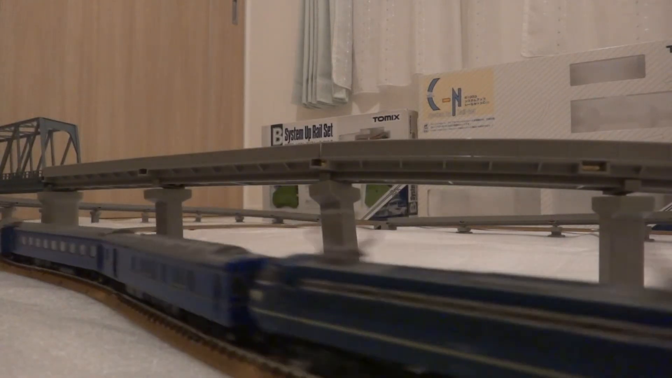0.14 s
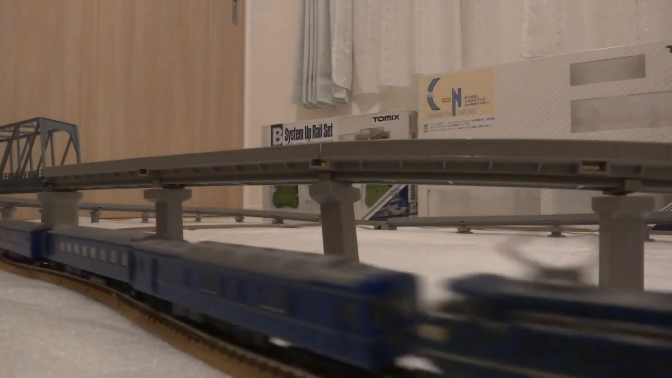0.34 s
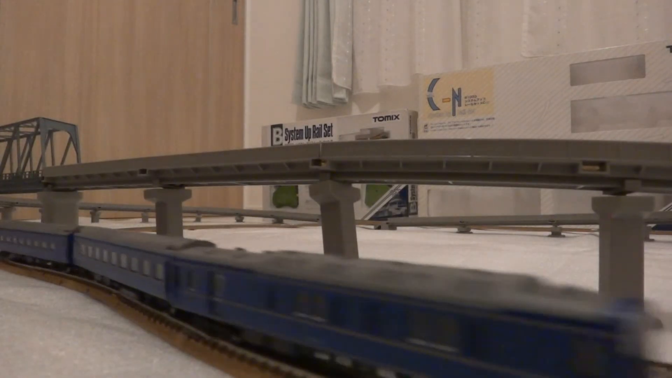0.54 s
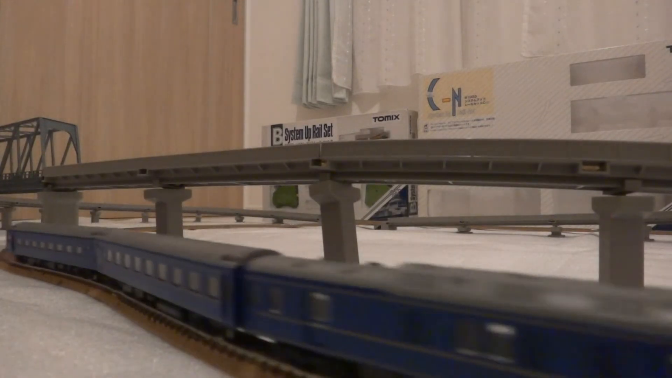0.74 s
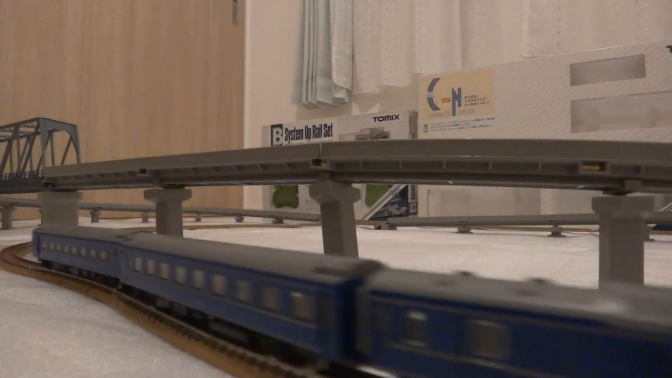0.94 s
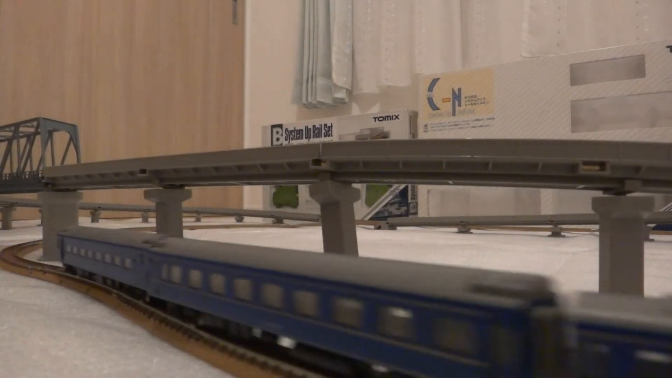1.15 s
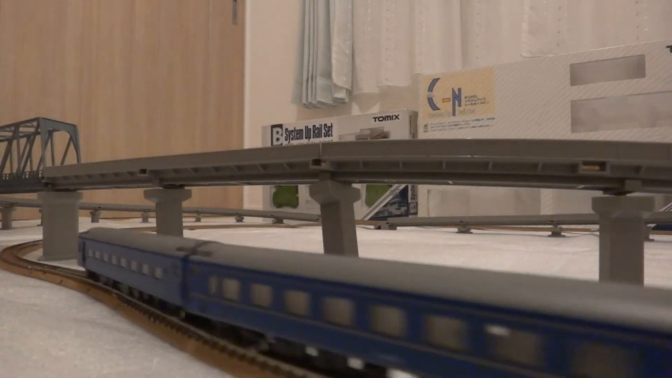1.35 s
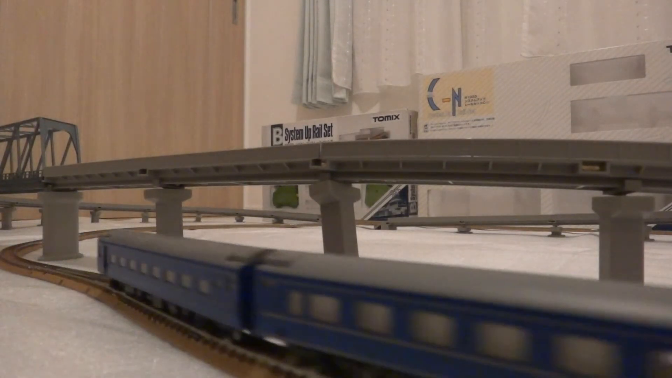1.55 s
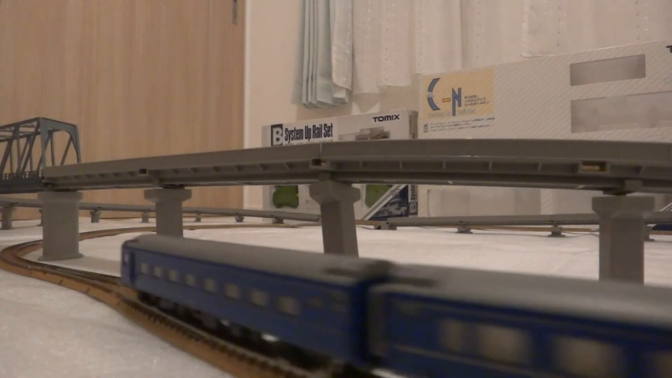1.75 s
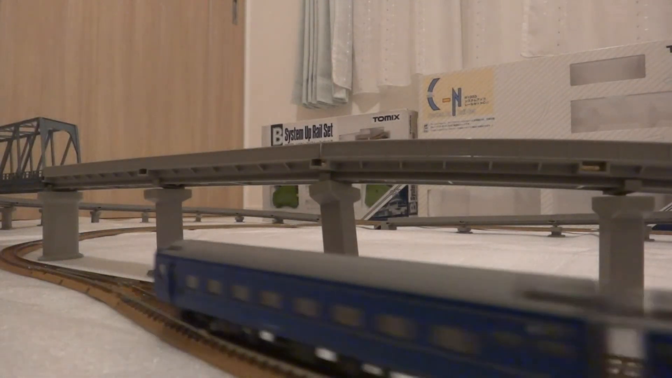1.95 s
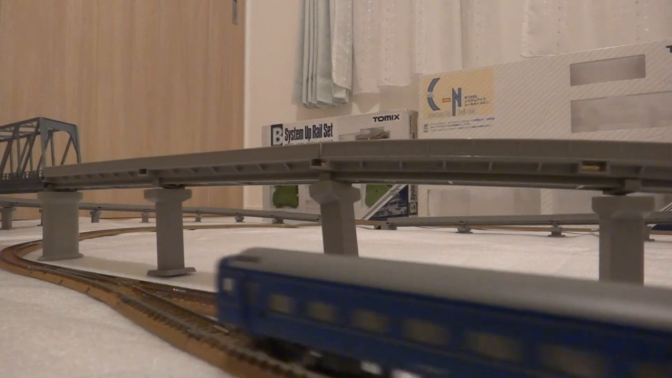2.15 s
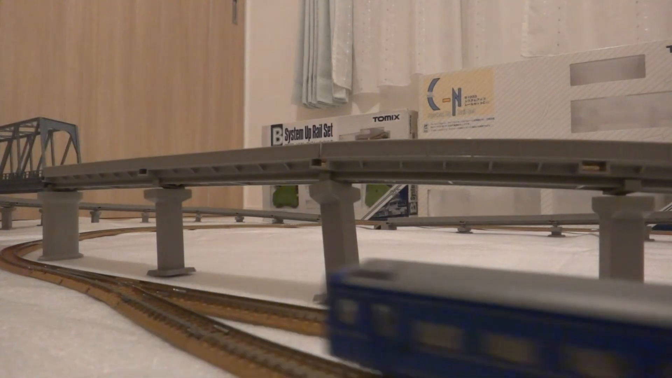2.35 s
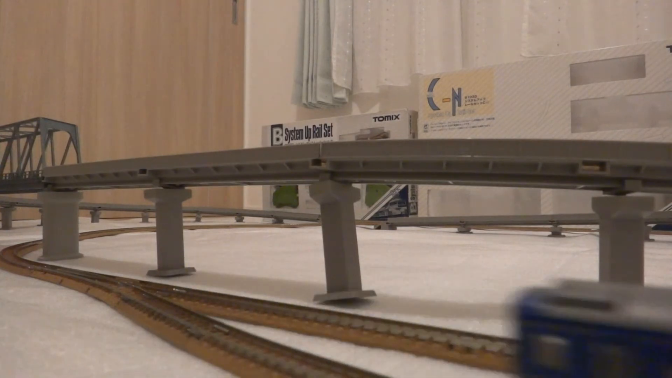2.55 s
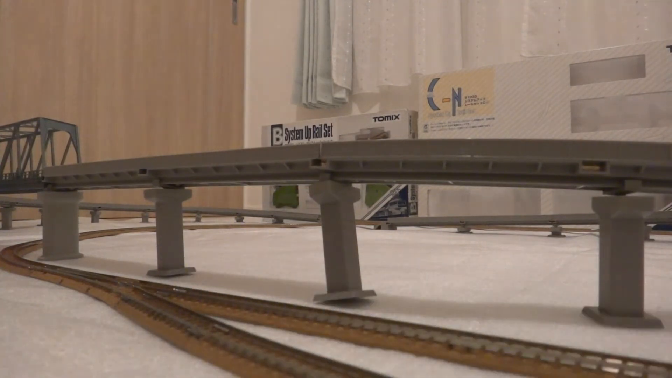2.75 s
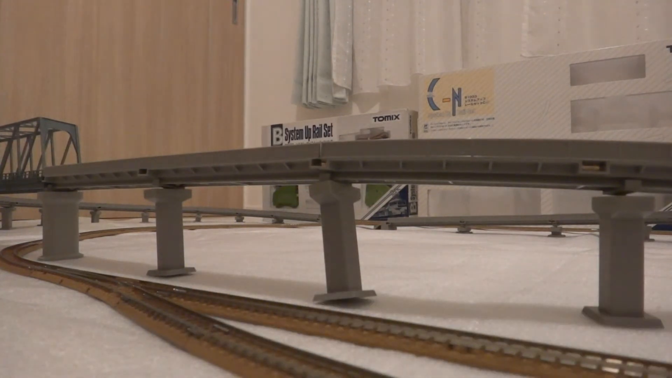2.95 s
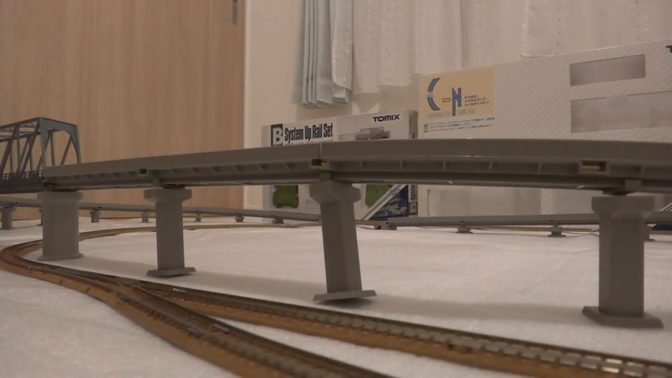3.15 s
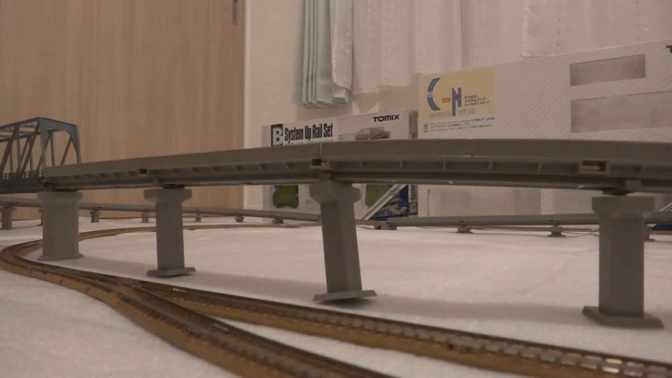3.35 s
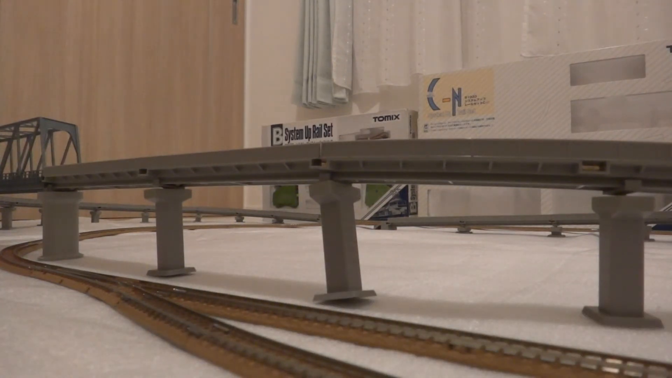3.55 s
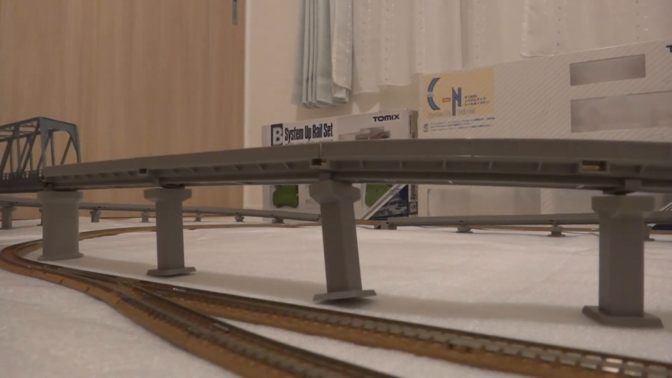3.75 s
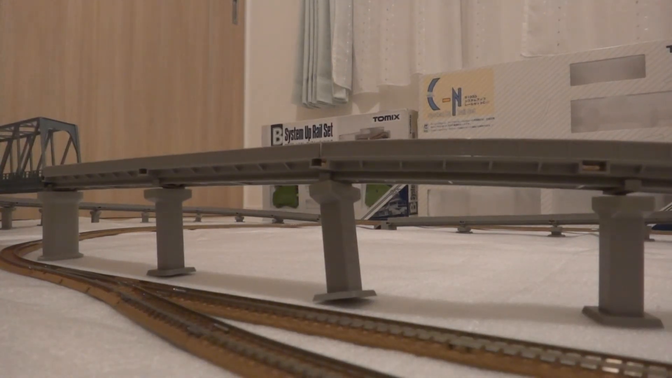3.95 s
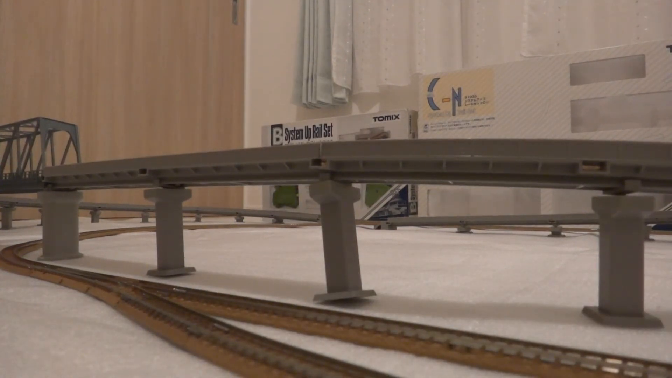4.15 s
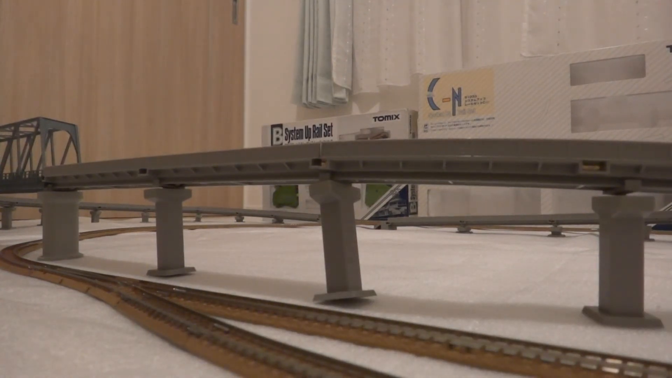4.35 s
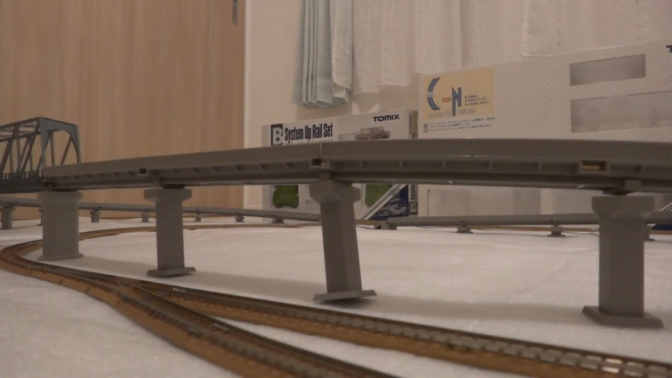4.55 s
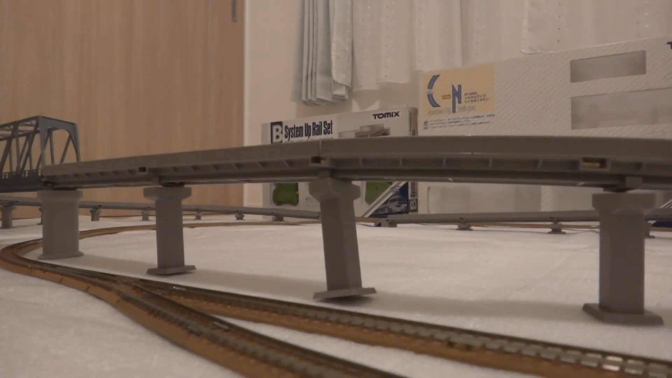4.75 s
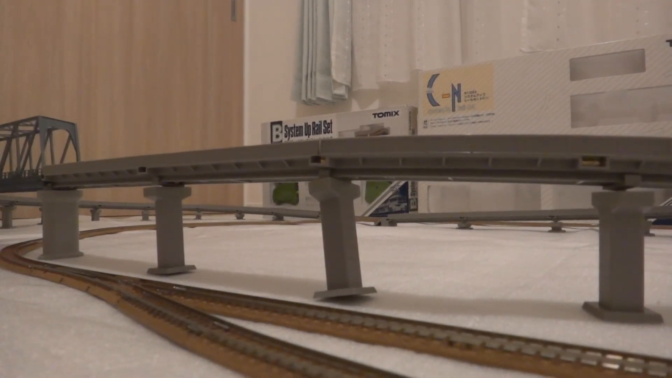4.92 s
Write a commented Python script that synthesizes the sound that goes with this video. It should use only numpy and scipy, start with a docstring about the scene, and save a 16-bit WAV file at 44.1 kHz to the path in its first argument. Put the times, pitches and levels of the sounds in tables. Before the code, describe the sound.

A model train's motor buzzes past in a quiet room, its coaches rushing and ticking over plastic track before receding.

```python
"""A small electric model train passes close by on plastic track in a quiet room and rounds the far curve.
The locomotive leads: periodic gear impacts make its shell buzz, and its pickups sizzle by sliding friction.
The coaches follow, their wheel roughness forcing the rails, bodies and hollow track bed into vibration.
Impacts at joints and points tick, wheel friction squeaks and sings in the curve, and at last a far
viaduct resonates with the locomotive. One soft bump is heard as the train recedes."""
import sys
import numpy as np
from scipy import signal
from scipy.fft import rfft, irfft
from scipy.io import wavfile

SR = 44100
rng = np.random.default_rng(int(sys.argv[2]) if len(sys.argv) > 2 else 0)


def dump(signal):
    """Clip the signal to [-1, 1] and save it as 16-bit WAV at the path in sys.argv[1]."""
    limited = np.clip(np.atleast_2d(signal).T, -1, 1)
    pcm = np.round(limited * 32767).astype(np.int16)
    wavfile.write(sys.argv[1], SR, pcm)


N = 224067
TIME = np.arange(N) / SR
FREQS = np.maximum(np.arange(N // 2 + 1) * SR / N, 1)

# Background noise of the room: frequency_hz, density_db
ROOM_SPECTRUM = [(20, -8), (45, -7), (85, 3.5), (125, -5), (175, 5), (240, 1), (400, -6), (700, -3),
                 (1100, 3.5), (3000, -41)]
# Stereo width of the reverberation: frequency_hz, side_gain_db
ROOM_WIDTH = [(30, -10), (70, -10.5), (130, -12), (260, -3.5), (500, -8), (1000, -10.5), (2500, -13.5),
              (6000, -12.5), (14000, -13)]
# Notches in the microphone response: centre_hz, width_hz, depth_fraction
MIC_NOTCHES = [(2260, 160, .22), (6820, 400, .2), (12240, 220, .56), (13490, 300, .67), (13930, 140, .45),
               (14730, 330, .63)]
# Channel balance: frequency_hz, left_minus_right_db
MIC_BALANCE = [(100, -1.5), (300, 0.5), (550, 0), (1000, -1), (2200, -2), (5000, -2.1), (9000, -1.2),
               (13000, 0)]

# Modes of the far viaduct: pitch_hz, width_hz, gain_db
VIADUCT_MODES = [(2600, 210, -2), (2940, 450, -0.5), (3500, 150, 0), (3850, 180, 0), (4560, 270, -0.5),
                 (5140, 270, 1.5), (6040, 310, -1), (7100, 220, -3), (8000, 340, 0), (8760, 240, -4),
                 (9970, 280, 1), (11300, 300, -8), (11800, 400, -9), (12400, 350, -4.5), (14600, 1400, -12)]
# Modes of the rails: pitch_hz, width_hz, gain_db
RAIL_MODES = [(1797, 120, -5), (2590, 78, 0), (3440, 220, 4.5), (3900, 190, 2), (4670, 230, 5.5),
              (5000, 260, 5.5), (5720, 250, 1.5), (6100, 180, 1)]
# Modes of wheels rubbing in the curve: pitch_hz, width_hz, gain_db
SONG_MODES = [(4850, 130, 0), (5020, 120, 0), (6000, 200, 0.5), (6500, 250, -3), (7600, 400, -4),
              (8650, 320, -2), (9600, 300, -13), (10900, 600, -0.5), (12800, 310, -13)]
# Wheels binding in the curve: peak_s, half_length_s, level_db
WHEEL_BINDS = [(2.104, 0.068, -25.5), (3.33, 0.07, -38)]
# Brief squeaks, scrapes and rings of the passing wheels and coach bodies:
# peak_s, half_length_s, pitch_hz, width_hz, slide_hz_per_s, level_db
SQUEAKS_AND_RINGS = [(1.856, 0.085, 3096, 1100, 0, -30.5), (1.9, 0.046, 10630, 1512, -6000, -26.5),
                     (2.164, 0.019, 11000, 1500, -9000, -30), (2.135, 0.018, 4800, 300, -1500, -32),
                     (2.7, 0.07, 4690, 172.8, -300, -35), (2.555, 0.05, 3550, 486, 4001.5, -32),
                     (2.69, 0.055, 3930, 203, -0.5, -35.5), (2.76, 0.041, 7960, 500, -6000, -33),
                     (2.867, 0.092, 1790, 260, -1.5, -38.5), (2.946, 0.13, 11350, 1100, 0.5, -37.5),
                     (2.96, 0.09, 4850, 185.2, 0, -39.5), (3.29, 0.055, 4780, 200, -6, -38),
                     (3.282, 0.08, 2560, 231.5, 0.5, -40), (3.16, 0.025, 8550, 740, -0.5, -33),
                     (3.33, 0.07, 6100, 200, 802, -35), (3.35, 0.042, 10800, 1400, 1.5, -34)]

# Blows on joints and points, often with a bounce: start_s, wheel_ring_db, rail_snap_db, bed_thump_db
JOINT_IMPACTS = [(0.512, -22, -20, -43), (0.574, -9, -5, -60), (0.632, -19, -6, -62), (0.695, -13, -9, -62),
                 (0.726, -9, -11, -52), (0.7604, -6, -9, -46), (0.7933, -14, -4, -63),
                 (0.7976, -14, -7, -60), (0.833, -17, -14, -45), (0.8366, -13, -6, -62),
                 (0.8754, -13, -6, -58), (0.9041, -11, -15, -56), (0.9147, -14, -12, -58),
                 (0.9448, -16, -6, -60), (0.983, -10, -5, -51), (1.0547, -8.5, -9, -64),
                 (1.0943, -9, -5, -62), (1.1668, -18, -5, -66), (1.223, -9, -6, -56),
                 (1.2312, -13, -11, -62), (1.2957, -7, -6, -45), (1.2984, -12, -3, -59),
                 (1.3092, -17, -12, -60), (1.3911, -8, -10, -56), (1.4653, -7, -8, -52),
                 (1.4986, -6.5, -13, -42), (1.5008, -12, -11, -62), (1.5058, -14, -11, -60),
                 (1.5078, -11, -12, -62), (1.5641, -10, -10, -42), (1.567, -8, -8, -60),
                 (1.5725, -3, -8, -52), (1.5751, -10, -8, -60), (1.5817, -6, -9, -54),
                 (1.6215, -10, -4, -45), (1.6907, -15, -7, -58), (1.739, -13, -11, -56),
                 (1.9695, -7, -13, -45), (1.9799, -4, -10, -50), (2.0338, -5.5, -8, -58),
                 (2.0413, -9, -6, -54), (2.1935, -6, -12, -62), (2.1964, -18, -10, -62),
                 (2.2564, -5, -8, -56), (2.553, -12, -18, -62), (2.66, -4.5, -17, -46),
                 (2.7338, -5.5, -10, -44), (2.8177, -16, -15, -57), (2.9115, -17, -10, -60),
                 (2.9862, -19, -12, -64), (3.0936, -15, -15, -66), (3.1296, -16, -15, -68),
                 (3.4096, -14, -11, -68), (3.4162, -12, -15, -72), (3.4826, -22, -19, -68),
                 (4.346, -19, -24, -69), (4.569, -22, -19, -70), (4.6366, -22, -16, -70),
                 (4.7798, -12, -14, -62), (4.848, -12, -18, -68), (4.9934, -18, -12, -65),
                 (5.0488, -20, -14, -70)]
# Modes of a struck wheel: pitch_hz, width_hz, gain_db
WHEEL_MODES = [(5200, 2600, -5), (8400, 1600, -0.5), (9900, 1300, -1.5)]
# Modes of a struck rail end: pitch_hz, width_hz, gain_db
RAIL_END_MODES = [(11500, 1000, 0.5), (12450, 1350, -1), (14500, 1100, -12)]
# Modes of the struck hollow track bed: pitch_hz, width_hz, gain_db
BED_MODES = [(260, 36, 3), (308, 60, -5), (500, 120, -14)]

# Strength of the rolling excitation: time_s, level_db
ROLL_LEVEL = [(0.0, -28), (0.07, -26.5), (0.28, -25.5), (0.44, -24.5), (0.64, -25), (0.9, -26),
              (1.16, -27.5), (1.29, -25.5), (1.56, -27.5), (1.63, -28.5), (1.69, -26), (1.93, -25.5),
              (2.01, -27), (2.12, -25), (2.62, -28), (3.03, -30.5), (3.28, -29.5), (3.55, -31),
              (3.95, -32.5), (5.08, -32)]
# Drumming of the track bed: frequency_hz, density_db
BED_SPECTRUM = [(60, -25), (130, -13.5), (205, -11), (255, -4), (330, -3.5), (500, 1), (700, 2), (1200, -3),
                (2500, -40)]
# Rush of the coach bodies: frequency_hz, density_db
COACH_SPECTRUM = [(400, -19.5), (680, -28), (830, -12), (1100, -6), (1300, -3.5), (1680, 2), (2100, 0),
                  (2900, -1), (4000, -11), (6000, -49)]
# Rush of the rails: frequency_hz, density_db
RAIL_SPECTRUM = [(700, -49), (1500, -22), (2200, -1), (2700, -0.5), (3600, 0.5), (4200, 1), (4750, -0.5),
                 (5300, -2.5), (5800, 0.5), (6900, -1.5), (8500, -11), (12000, -8.5)]
# Hiss of rubbing flanges: frequency_hz, density_db
FLANGE_SPECTRUM = [(4000, -4), (6500, -8), (7600, -2.5), (8700, -2.5), (10000, -3), (11400, -4.5),
                   (12800, -8), (14000, -13.5), (15600, -24)]
# Modes of the hollow coach bodies: pitch_hz, width_hz, gain_db
COACH_MODES = [(832, 50, -8.5), (1132, 160, -0.5), (1440, 170, -2), (1700, 126, 2), (1904, 120, 2.5)]
# Coach bodies ringing out as they roll by: peak_s, half_length_s, boost_db
COACH_SWELLS = [(0.74, 0.17, 1), (1.095, 0.061, 8.5), (1.877, 0.055, 2), (2.216, 0.13, 2),
                (2.5, 0.045, 3.5)]

# Speed of the motor: time_s, rotation_hz
MOTOR_SPEED = [(0, 200), (.15, 187), (.34, 196), (.42, 188), (.55, 184), (.9, 180)]
# Modes of the locomotive shell: pitch_hz, width_hz, gain_db
SHELL_MODES = [(1690, 50, -2), (2200, 290, 3.5), (2660, 220, 4), (2900, 310, 5), (3200, 240, -3),
               (3820, 160, 4), (4490, 110, 2)]
# Sizzle of the pickups: frequency_hz, density_db
PICKUP_SPECTRUM = [(4000, -52), (7200, -10), (8100, -1), (8700, 2.5), (9400, 1.5), (10300, 0.5),
                   (11500, -4.5), (13000, -7), (13700, -16), (14150, -1), (14600, -7), (15600, -4.5)]
# Brief labouring of the drive: peak_s, half_length_s, boost_db
DRIVE_SURGES = [(0.138, 0.0098, 1.5), (0.28, 0.031, 3.5), (0.5, 0.007, 3.8), (0.533, 0.008, 3),
                (0.561, 0.0056, 4.5)]


def from_db(db):
    """Amplitude grows tenfold with every 20 dB."""
    return 10 ** (np.asarray(db) / 20)


def rms_one(x):
    """Normalisation to unit mean power."""
    return x / np.sqrt(np.mean(x ** 2) + 1e-20)


def over_time(points):
    """Linear interpolation of a curve at every sample."""
    return np.interp(TIME, *np.transpose(points))


def over_hz(points):
    """Interpolation of a curve on a logarithmic frequency axis."""
    hz, value = np.transpose(points)
    return np.interp(np.log(FREQS), np.log(hz), value)


def passing(full_s, until_s, rise_db_per_s, fall_db_per_s):
    """Exponential growth and decay, in dB, on either side of a plateau at 0 dB."""
    return -rise_db_per_s * np.maximum(full_s - TIME, 0) - fall_db_per_s * np.maximum(TIME - until_s, 0)


def swell(peak_s, half_s):
    """A Gaussian envelope of height 1 and standard deviation half_s."""
    return np.exp(-((TIME - peak_s) / half_s) ** 2 / 2)


def drift(rate_hz):
    """Low-pass filtering turns noise into a slow random fluctuation of rms 1."""
    pole = np.exp(-2 * np.pi * rate_hz * 10 / SR)
    slow = signal.lfilter([1], [1, -2 * pole, pole * pole], rng.standard_normal(N // 10 + 2002))[2000:]
    return np.interp(np.arange(N) / 10, np.arange(len(slow)), rms_one(slow))


def colour(x, spectrum):
    """Spectral shaping, with steep skirts beyond the ends of the table; rms 1."""
    skirts = 1 / np.sqrt((1 + (spectrum[0][0] / FREQS) ** 6) * (1 + (FREQS / spectrum[-1][0]) ** 6))
    return rms_one(irfft(rfft(x) * from_db(over_hz(spectrum)) * skirts, N))


def resonance(x, hz, width_hz):
    """A damped oscillator with a peak gain of 1."""
    radius = np.exp(-np.pi * width_hz / SR)
    feedback = [1, -2 * radius * np.cos(2 * np.pi * hz / SR), radius ** 2]
    return signal.lfilter(np.array([1, 0, -1]) * (1 - radius ** 2) / 2, feedback, x + 1e-18)


def body(x, modes):
    """Modal superposition: a body responds with the sum of its resonances."""
    return sum(from_db(db) * resonance(x, hz, width) for hz, width, db in modes)


def high_pass(x, hz):
    """Radiation efficiency: small parts give off little bass."""
    return signal.sosfilt(signal.butter(4, hz, "high", fs=SR, output="sos"), x)


def contacts(grain_db, flutter_db):
    """Contact noise: countless tiny collisions come in clumps under a fluttering load."""
    return rng.standard_normal(N) * from_db(grain_db * drift(290) + flutter_db * drift(28))


def singing(modes, flicker_db):
    """Friction feeds each mode unevenly, so each swells and fades by itself; rms 1."""
    rubs = rng.standard_normal((3, N))
    rings = sum(from_db(db + flicker_db * drift(5.3)) * resonance(rubs[k % 3], hz, width)
                for k, (hz, width, db) in enumerate(modes))
    return rms_one(high_pass(rings, 0.75 * modes[0][0]))


def coaches_close(arrive_s=0.39, arriving_s=0.49, leave_s=2.84, leaving_s=0.11):
    """Proximity: ramps to 1 as the coaches reach the microphone and to 0 as they leave."""
    return np.clip(np.minimum((TIME - arrive_s) / arriving_s, 1 - (TIME - leave_s) / leaving_s), 0, 1)


def driven(level_db, exponent, close_db, close_db_per_s, usual_roll_db=-25, arrive_s=0.39):
    """Forced response: a part's gain is a power of the rolling excitation, offset near the coaches."""
    roll_db = over_time(ROLL_LEVEL) - usual_roll_db
    offset_db = close_db + close_db_per_s * (TIME - arrive_s)
    return from_db(level_db + exponent * roll_db + offset_db * coaches_close())


def room_tone():
    """Stationary noise, mostly low in frequency, forms the floor of the quiet room."""
    return from_db(-66.5) * colour(rng.standard_normal(N), ROOM_SPECTRUM)


def room(x, t60_s=0.35, tail_db=-12.5, close_pan_db=0.5):
    """Diffuse reflection adds a faint, wide tail; the image leans left while the coaches are close."""
    age = TIME[:SR // 2]
    echoes = rng.standard_normal((2, len(age))) * from_db(-60 * age / t60_s)
    front, across = (signal.fftconvolve(x, echo / np.linalg.norm(echo))[:N] for echo in echoes)
    mid = x + from_db(tail_db) * front
    side = irfft(rfft(across) * from_db(over_hz(ROOM_WIDTH)), N)
    pan = from_db(close_pan_db * coaches_close() * np.array([[.5], [-.5]]))
    return np.array([mid + side, mid - side]) * pan


def bump(at_s=3.6397, peak_db=-42):
    """Heavy damping reduces a low resonance to one dull bump."""
    push = np.exp(-((TIME - at_s) / .0005) ** 2)
    thud = resonance(-push, hz=80, width_hz=200)
    return from_db(peak_db) * thud / np.max(np.abs(thud))


def viaduct(start_s=3.09, onset_db_per_s=32, approach_db_per_s=4.5):
    """Structure-borne sound: the far viaduct rings as the locomotive runs onto it and slowly nears."""
    since = TIME - start_s
    level_db = -40.5 + np.minimum(onset_db_per_s * since, approach_db_per_s * since)
    return from_db(level_db) * singing(VIADUCT_MODES, flicker_db=3.0)


def rail_ring():
    """Resonance: the rails ring at their natural frequencies under the rolling wheels."""
    gain = driven(-31.5, exponent=0.73, close_db=0, close_db_per_s=0.24)
    return gain * from_db(passing(1.4, 3.77, 12, 7.4)) * singing(RAIL_MODES, flicker_db=2.0)


def wheel_song():
    """Friction in the curve excites the wheel modes, which sing out where the wheels bind."""
    curving = from_db(-34.5 + passing(2.87, 3.38, 18, 70))
    binding = sum(from_db(db) * swell(s, half) for s, half, db in WHEEL_BINDS)
    return (curving + binding) * singing(SONG_MODES, flicker_db=4.5)


def squeaks_and_rings():
    """Narrow-band noise: wheels and coach bodies briefly squeak, scrape and ring; some pitches slide."""
    rubs = rng.standard_normal(N) + 1j * rng.standard_normal(N)
    out = np.zeros(N)
    for s, half, hz, width, slide, db in SQUEAKS_AND_RINGS:
        pole = np.exp(-np.pi * width / SR)
        band = signal.lfilter([1], [1, -2 * pole, pole * pole], rubs)
        phase = 2 * np.pi * np.cumsum(hz + slide * (TIME - s)) / SR
        out += from_db(db) * swell(s, half) * rms_one(np.real(band * np.exp(1j * phase)))
    return high_pass(out, 1200)


def chatters(times, levels_db, rise_s=0.00066):
    """Contact chatter: each wheel impact is a burst of irregular force a few milliseconds long."""
    out, age = np.zeros(N), TIME[:SR // 50]
    envelope = age / rise_s * np.exp(1 - age / rise_s)
    for s, db, grains in zip(times, levels_db, rng.standard_normal((len(times), len(age)))):
        start = int(s * SR)
        burst = (from_db(db) * np.tanh(grains) * envelope)[:N - start]
        out[start:start + len(burst)] += burst
    return out


def faint_ticks(count=22, spread_db=2, close_db=2):
    """Light impacts fall at random times, stronger while the coaches are close."""
    levels_db = -22 + spread_db * rng.standard_normal(count)
    return chatters(rng.uniform(0, TIME[-1], count), levels_db) * from_db(close_db * coaches_close())


def rail_joints(ring_db=-1.0, snap_db=-1.3, bed_db=3.0):
    """Impact excitation: each blow rings the wheel and rail end; heavier ones thump the track bed."""
    times, rings_db, snaps_db, thumps_db = np.transpose(JOINT_IMPACTS)
    faint = faint_ticks()
    ring = high_pass(body(chatters(times, rings_db) + faint, WHEEL_MODES), 2400)
    snap = high_pass(body(chatters(times, snaps_db) + faint, RAIL_END_MODES), 8700)
    pushes = np.zeros(N)
    pushes[(times * SR).astype(int)] = from_db(thumps_db)
    thud = high_pass(body(signal.unit_impulse(SR // 5), BED_MODES), 224)
    thumps = signal.fftconvolve(pushes, thud / np.max(np.abs(thud)))[:N]
    return from_db(ring_db) * ring + from_db(snap_db) * snap + from_db(bed_db) * thumps


def rolling():
    """Forced vibration: wheel roughness shakes track bed, coach bodies and rails, while flanges rub."""
    bed = colour(contacts(grain_db=3.5, flutter_db=0.95), BED_SPECTRUM)
    bed *= driven(-57, exponent=0.01, close_db=3, close_db_per_s=1.4)
    coach = colour(contacts(grain_db=1.0, flutter_db=1.1), COACH_SPECTRUM)
    coach *= driven(-36.5, exponent=1, close_db=10.5, close_db_per_s=-3)
    swells_db = sum(db * swell(s, half) for s, half, db in COACH_SWELLS)
    coach_ring = from_db(swells_db) * singing(COACH_MODES, flicker_db=2.5)
    coach_ring *= driven(-47.5, exponent=1.6, close_db=6, close_db_per_s=4)
    rail = colour(contacts(grain_db=1.8, flutter_db=0.9), RAIL_SPECTRUM)
    rail *= driven(-24.5, exponent=1.32, close_db=1, close_db_per_s=-0.58)
    flange = colour(contacts(grain_db=1.74, flutter_db=0.76), FLANGE_SPECTRUM)
    flange *= driven(-23.5, exponent=2.06, close_db=-0.5, close_db_per_s=0.45)
    return bed + coach + coach_ring + rail + flange


def pickups(motor_angle, depth_db=2.5):
    """Sliding friction at the pickups sizzles, amplitude-modulated by the turning of the motor."""
    pulsing = from_db(depth_db * (np.cos(motor_angle) + .8 * np.cos(3 * motor_angle)))
    scrapes = contacts(grain_db=.8, flutter_db=.4) * pulsing
    return from_db(-17 + passing(0, .16, 6, 37)) * colour(scrapes, PICKUP_SPECTRUM)


def gears(motor_angle, rub_db=-2.0, knock_db=-1.5, whine_db=-36.0):
    """Periodic impact: the gears knock the shell once a turn, rub, and whine at harmonics 3 and 4."""
    surges_db = sum(db * swell(s, half) for s, half, db in DRIVE_SURGES)
    level_db = -22.5 + passing(0.18, 0.46, 16, 11.8) + surges_db
    rubs = contacts(grain_db=0.5, flutter_db=1.7)
    rubbing = from_db(rub_db) * rms_one(high_pass(body(rubs, SHELL_MODES), 1600))
    # play in the gears makes each knock a little early or late
    whole_turns = np.maximum.accumulate(np.floor(motor_angle / (2 * np.pi) + .035 * drift(150)))
    knocks = np.diff(whole_turns, prepend=0) * from_db(1.1 * drift(100))
    knocking = rms_one(body(resonance(knocks, hz=3030, width_hz=900), SHELL_MODES))
    # the harder the drive labours, the more the knocks stand out
    knocking *= from_db(knock_db + 1.3 * (level_db - level_db.max()))
    whine = np.sin(4 * motor_angle) + .45 * np.sin(3 * motor_angle)
    whine *= from_db(whine_db + passing(.1, .37, 30, 110) + 2 * drift(12))
    return from_db(level_db) * (rubbing + knocking + whine)


def locomotive(wobble=0.0064, past_s=0.76, fade_db_per_s=64):
    """Motor rotation sets the period of gears and pickups; both fade fast once past the microphone."""
    rotation_hz = over_time(MOTOR_SPEED) * (1 + wobble * drift(27))
    motor_angle = 2 * np.pi * np.cumsum(rotation_hz) / SR
    receding = from_db(-fade_db_per_s * np.maximum(TIME - past_s, 0))
    return receding * (gears(motor_angle) + pickups(motor_angle))


def scene():
    """Superposition: train and room tone reverberate together, and the bump is added dry."""
    train = locomotive() + rolling() + rail_ring() + wheel_song()
    train += viaduct() + squeaks_and_rings() + rail_joints()
    return room(train + room_tone()) + bump()


def record(dry, cutoff_hz=15600):
    """Frequency response: the microphone has treble notches, a slight lean right and a steep top cut."""
    for hz, width, depth in MIC_NOTCHES:
        dry = dry - depth * resonance(dry, hz, width)
    lean = from_db(over_hz(MIC_BALANCE) * np.array([[.5], [-.5]]))
    low_pass = 1 / np.sqrt(1 + (FREQS / cutoff_hz) ** 400)
    return irfft(rfft(dry) * lean * low_pass, N)


dry = scene()
out = record(dry)
dump(out)
```